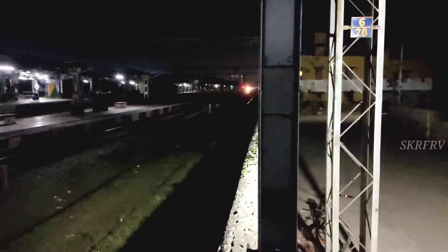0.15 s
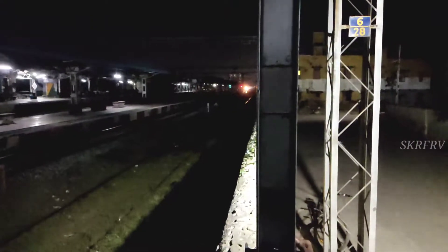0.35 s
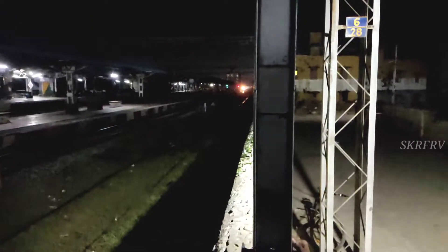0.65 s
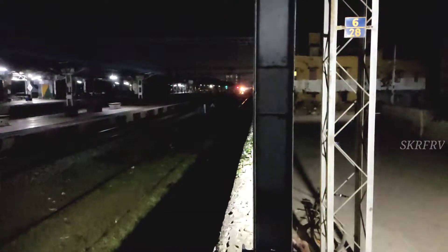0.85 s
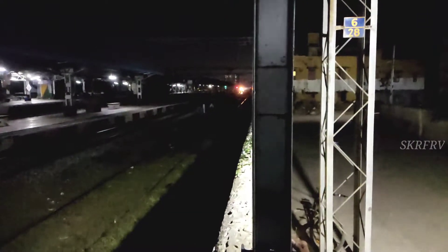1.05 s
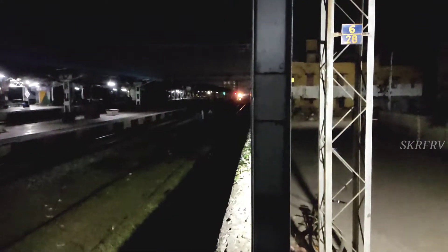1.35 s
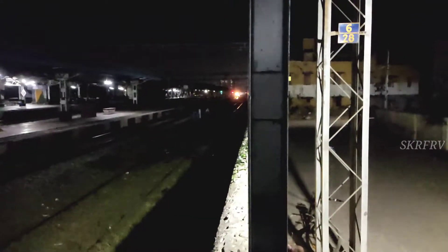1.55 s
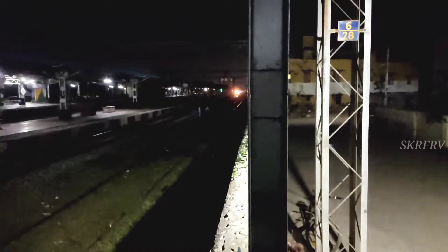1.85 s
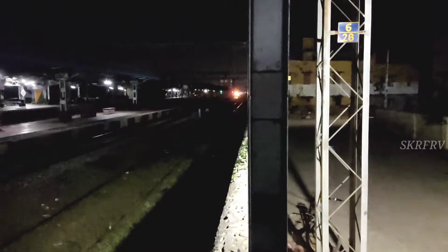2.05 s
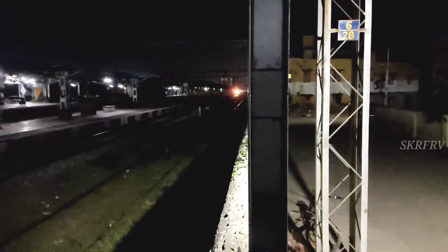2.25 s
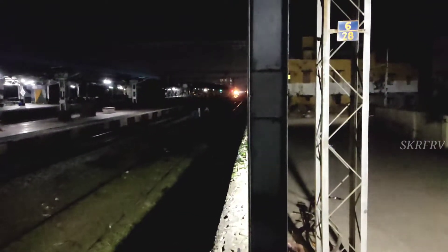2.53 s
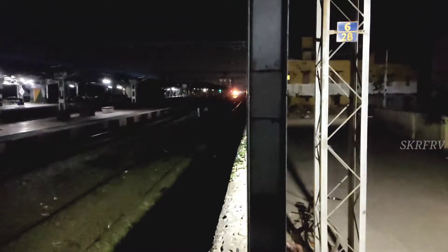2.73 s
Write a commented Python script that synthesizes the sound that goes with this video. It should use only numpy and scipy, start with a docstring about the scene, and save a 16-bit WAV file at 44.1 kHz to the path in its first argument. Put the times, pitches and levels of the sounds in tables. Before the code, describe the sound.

A train rolls away beside an open station platform, its drive motors giving a wavering, fuzzy mid-pitched whine over low hums, wheel rumble and airy hiss, all gradually fading; close handheld stereo microphone outdoors.

```python
"""A train rolls away past a station platform, in stereo, under 3 s.
From the start its traction drive whines on fuzzy overtones (wavering tones on noise skirts), over low and deep
hums and wheel noise (shaped, patchy noise). A third hum swells to a peak near 1.4 s; the roar jumps
briefly near 2.1 s. By the end the upper whine, hums, roar, sizzle and hiss have died down."""
import sys
import numpy as np
from scipy import signal
from scipy.fft import rfft, irfft, next_fast_len
from scipy.io import wavfile
from scipy.ndimage import uniform_filter1d, map_coordinates

SR = 44100
rng = np.random.default_rng(int(sys.argv[2]) if len(sys.argv) > 2 else 0)


def master(y):
    """Save y as 16-bit WAV."""
    cut = np.clip(np.atleast_2d(y).T, -1, 1)
    pcm = np.round(cut * 32767)  # scale
    wavfile.write(sys.argv[1], SR, pcm.astype(np.int16))


N = 127449


def amp(db):
    """Amplitude from dB."""
    return 10 ** (np.asarray(db) / 20)


def unit(x):
    """x scaled to rms 1 over all channels."""
    return x / np.sqrt(np.mean(abs(x) ** 2) + 1e-20)


def along(points, hz):
    """(Hz, value) points interpolated on a log frequency axis."""
    point_hz, value = np.transpose(points)
    return np.interp(np.log(hz + 1), np.log(point_hz + 1), value)


def curve(rows):
    """Each column after the time, interpolated at every sample."""
    time_s, *columns = np.transpose(rows)
    return np.array([np.interp(np.arange(N) / SR, time_s, c) for c in columns])


def wobble(knots_per_s):
    """Smooth random curve: a spline through normal draws."""
    knots = rng.standard_normal(int(N * knots_per_s / SR) + 4)
    return map_coordinates(knots, [np.arange(N) * knots_per_s / SR])


def filtered(x, response):
    """x filtered by a complex response of frequency in Hz."""
    m = next_fast_len(N + SR // 4)
    return irfft(rfft(x, m) * response(np.fft.rfftfreq(m, 1 / SR)), m)[..., :N]


def half_turn(alike):
    """Mid-side mixing angle whose left-right correlation is alike."""
    return np.arccos(np.clip(alike, 0, 1)) / 2


def spread(pair, alike):
    """Left and right of a given correlation from two unrelated signals."""
    turn = half_turn(alike)
    mid, side = np.cos(turn) * pair[0], np.sin(turn) * pair[1]
    return np.array([mid + side, mid - side])


def narrow(width_hz, alike):
    """Stereo complex noise, half amplitude at +-width_hz: random swelling and wavering for a tone."""
    f = np.fft.fftfreq(next_fast_len(N), 1 / SR)
    noise = rng.standard_normal((2, len(f))) + 1j * rng.standard_normal((2, len(f)))
    pair = spread(noise, alike)
    return unit(np.fft.ifft(pair / (1 + (f / width_hz) ** 2))[:, :N])


def tone(hz):
    """Rotating phasor whose real part has rms 1."""
    return np.sqrt(2) * np.exp(2j * np.pi * np.cumsum(hz + np.zeros(N)) / SR)


def rush(spectrum, level, patchy_db, flutter_db):
    """Stereo noise: random gain patches in time and frequency, shaped spectrum, fluttering level curve."""
    # Left-right likeness: hz, correlation
    likeness = [(60, 1), (330, 0.98), (480, .62), (1000, 0.33), (1800, 0.18), (4000, 0.36), (6000, 0.29),
                (8500, .1)]
    # Stereo balance: hz, left_over_right_db
    balance = [(60, 4.5), (350, 3.5), (520, 3), (1000, 0.5), (1700, 6), (2700, -3.5), (4000, -0.1),
               (6000, -0.1), (7300, -4), (8600, 3), (12000, -1.5)]

    z = signal.stft(rng.standard_normal((2, N)), nperseg=512)[2]
    # Patches: 5 bins by 12 frames, same on both channels
    field = uniform_filter1d(rng.standard_normal(z.shape[1:]), 5, axis=0)
    field = uniform_filter1d(field, 12, axis=1)
    pair = signal.istft(z * amp(patchy_db * unit(field)), nperseg=512)[1][:, :N]

    def mid_side_response(hz):
        turn = half_turn(along(likeness, hz))
        return amp(along(spectrum, hz)) * [np.cos(turn), np.sin(turn)]

    mid, side = filtered(pair, mid_side_response)
    stereo = unit(np.array([mid + side, mid - side]))
    balanced = filtered(stereo, lambda hz: amp([0 * hz, -along(balance, hz)]))
    return balanced * amp(curve(level) + flutter_db * wobble(7.16))


def wheels():
    """Rumble of the bogies, roar of wheel on rail; sizzle and hiss above it drift to the right."""
    # Noise spectra: hz, relative_density_db
    rumble = [(15, -7.5), (30, -14), (65, -6.5), (125, -12), (160, -5), (200, 3.5), (270, -0.5), (370, -6),
              (500, -3), (800, -56)]
    roar = [(250, -6), (430, -1.8), (540, -7), (610, 0), (680, -5), (800, -6.5), (1200, -9.5),
            (1300, -11.5), (1750, -8), (2200, -8.5), (2700, -17.5), (3700, -21.5), (4300, -41), (6000, -79)]
    sizzle = [(2600, -18), (3100, -11), (3800, -3), (4300, -1), (4800, -4.5), (5300, -7), (6200, -38)]
    hiss = [(4200, -23), (4900, -8.5), (5500, -2), (6400, -4.5), (7300, 0.5), (8200, 0), (9000, -4),
            (9600, -23), (10500, -27), (12000, -31), (14000, -60)]
    # Levels before balance and flutter, both channels: time_s, level_db
    rumble_level = [(0, -27), (.4, -27), (.8, -27), (1.3, -30), (1.5, -27.5), (1.7, -31.5), (2.2, -28),
                    (2.4, -32.5), (2.89, -30)]
    roar_level = [(0, -25), (.3, -26.5), (.95, -27), (1.05, -26), (1.2, -28), (1.8, -30), (2.03, -30),
                  (2.08, -25), (2.14, -29.5), (2.89, -32)]
    # Levels before balance and flutter: time_s, left_db, right_db
    sizzle_level = [(0, -39.5, -42), (.8, -42.5, -42.5), (1.2, -44, -43), (1.4, -40.5, -39.5),
                    (1.7, -42, -41), (1.9, -48, -41.5), (2.05, -45.5, -39), (2.3, -49.5, -43.5),
                    (2.89, -54.5, -45)]
    hiss_level = [(0, -33.5, -35.5), (.55, -32.5, -33), (1, -33, -33.5), (1.5, -36, -35), (2.07, -35, -34),
                  (2.3, -38.5, -37.5), (2.89, -40, -37.5)]

    return (rush(rumble, rumble_level, patchy_db=1.5, flutter_db=0.6)
            + rush(roar, roar_level, patchy_db=1.5, flutter_db=0.9)
            + rush(sizzle, sizzle_level, patchy_db=2.0, flutter_db=1.5)
            + rush(hiss, hiss_level, patchy_db=1.5, flutter_db=0.54))


def weak_lines():
    """Faint fuzzy partials: narrow noise on a tone, with a steady fade, one swell and a random level."""
    # Weak partials: pitch_hz, left_start_db (before swell), fade_db_per_s, swell_time_s, swell_db,
    # waver_half_width_hz, left_over_right_db, left_right_correlation
    weak = [(1178, -46, 4, 1.75, 9, 8, 2, .6), (1458, -48, .5, 1.7, 5, 12, 4, .7),
            (2030, -45, -3, 2.1, 1, 50, 5, .5), (2430, -42, 3, .8, 2, 30, 1.5, .6),
            (2915, -48, 2.5, 1.65, 7, 20, -1, .6), (3325, -51, 1, 2.15, 5, 16, 1, .6),
            (3868, -53, 2, 1.4, 2, 45, -2, .6)]
    swell_width_s, random_level_db = 0.3, 3

    out, t = 0, np.arange(N) / SR
    for hz, start_db, fade_db_per_s, swell_time_s, swell_db, width_hz, pan_db, alike in weak:
        swell = np.exp(-((t - swell_time_s) / swell_width_s) ** 2)
        level_db = start_db - fade_db_per_s * t + swell_db * swell
        level_db = level_db + random_level_db * wobble(2.99)
        line = (narrow(width_hz, alike) * tone(hz)).real
        out = out + amp(level_db - [[0], [pan_db]]) * line
    return out


def strong_lines():
    """Drive overtones and hums: tone plus narrow flutter, on a skirt following the slow level."""
    # Whine partials, then hums, before pitch drift: time_s, pitch_hz, left_db, right_db (skirt excluded)
    first = [(0.0, 484, -37, -28), (0.14, 487, -33, -28), (0.18, 489, -32, -36), (0.26, 493, -37, -37),
             (0.33, 492, -25, -25), (0.42, 492, -28, -36), (0.48, 492, -25, -29), (0.57, 491, -30, -27),
             (0.63, 490, -22, -24), (0.7, 489, -25, -21), (0.76, 489, -22, -22), (0.8, 490, -26, -26),
             (0.86, 490, -24, -22), (0.92, 490, -28, -26), (1.02, 491, -24, -22), (1.12, 491, -26, -32),
             (1.16, 492, -35, -34), (1.2, 492, -23, -26), (1.32, 488, -28, -27), (1.46, 489, -24, -36),
             (1.52, 489, -28, -26), (1.6, 489, -21, -21), (1.68, 488, -22, -24), (1.76, 488, -31, -33),
             (1.82, 489, -23, -25), (1.92, 490, -33, -37), (1.98, 489, -23, -30), (2.14, 492, -34, -38),
             (2.18, 491, -37, -30), (2.24, 490, -33, -28), (2.3, 490, -31, -39), (2.36, 490, -33, -33),
             (2.42, 490, -21, -27), (2.48, 491, -31, -32), (2.6, 493, -29, -32), (2.72, 492, -39, -41),
             (2.8, 492, -29, -32), (2.88, 493, -29, -34)]
    second = [(0.0, 983, -16, -21), (0.16, 984, -19, -28), (0.21, 985, -17, -24), (0.26, 986, -10, -16),
              (0.38, 986, -10, -13), (0.45, 984, -17, -18), (0.56, 982, -20, -25), (0.62, 983, -11, -16),
              (0.73, 982, -11, -13), (0.8, 980, -16, -15), (0.88, 979, -21, -17), (0.92, 979, -17, -18),
              (0.96, 979, -24, -24), (1.0, 982, -20, -27), (1.1, 987, -18, -21), (1.14, 985, -23, -24),
              (1.22, 979, -17, -17), (1.46, 981, -25, -27), (1.52, 981, -19, -23), (1.58, 979, -19, -26),
              (1.62, 978, -15, -19), (1.7, 977, -24, -17), (1.82, 975, -18, -24), (1.86, 976, -26, -26),
              (1.9, 978, -24, -24), (1.98, 980, -23, -30), (2.02, 979, -18, -25), (2.06, 978, -27, -30),
              (2.14, 978, -21, -24), (2.26, 978, -22, -30), (2.38, 978, -19, -23), (2.46, 980, -21, -30),
              (2.5, 983, -25, -33), (2.56, 982, -28, -26), (2.66, 983, -30, -25), (2.7, 984, -27, -33),
              (2.88, 982, -28, -32)]
    fourth = [(0, 1962, -35, -39), (.26, 1952, -32, -35), (.4, 1955, -34, -37), (.8, 1950, -33, -39),
              (1.3, 1938, -31, -39), (1.9, 1938, -32, -40), (2.4, 1955, -34, -42), (2.52, 1955, -32, -37),
              (2.88, 1955, -33, -40)]
    seventh = [(0, 3405, -33.5, -42), (.32, 3420, -41, -39), (0.451, 3417, -32.5, -35),
               (.55, 3405, -36, -44), (.65, 3420, -38, -35.5), (.75, 3445, -37.5, -39),
               (.87, 3407, -32, -27.5), (1.05, 3402, -37, -37.5), (1.2, 3395, -44, -38),
               (1.38, 3396, -43, -40.5), (1.84, 3390, -50, -45), (2.1, 3403, -56, -55.5)]
    low_hum = [(0, 226, -33.5, -42), (.25, 228, -27.5, -39), (.33, 226, -34, -35), (.42, 226, -30, -33),
               (.68, 225, -27, -31), (.82, 224, -38, -49), (.9, 226, -27, -31), (1.02, 224, -41.5, -41),
               (1.12, 222, -31.5, -38.5), (1.5, 220, -49, -55), (1.9, 222, -27, -33), (2.2, 220, -35, -40),
               (2.88, 219, -44, -47)]
    swelling_hum = [(0, 328, -53.5, -59), (0.599, 330, -38, -54), (1.141, 314, -33, -42),
                    (1.25, 320, -36, -42), (1.4, 322, -27, -33), (1.6, 322, -34, -44),
                    (1.899, 315, -35, -47), (2.1, 320, -35, -45), (2.881, 321, -43.5, -57)]
    deep_hum = [(0, 66, -34.5, -46), (.3, 68, -48.5, -50), (.75, 68.3, -50, -53), (.92, 69, -31.5, -37),
                (1.25, 67.8, -38.5, -44), (1.35, 65.8, -49, -52), (1.5, 61.7, -35, -40),
                (1.74, 65.3, -51, -52), (1.84, 65.8, -31, -35), (1.92, 68, -44, -48), (2, 69.7, -33, -37),
                (2.2, 67.8, -54, -54), (2.88, 68, -54, -55)]
    # Slow phase turn between the ports, before random drift: time_s, left_lead_rad
    first_turn = [(0, -.6), (.36, .3), (.44, -1), (.68, -.3), (.92, -1.3), (1, .1), (1.38, -.7), (1.84, .4),
                  (2.2, -.2), (2.4, 1.9), (2.8, -.8)]
    second_turn = [(0.2, -.6), (.68, 0), (.76, -.7), (1.4, .1), (1.65, -.3), (1.71, 2.7), (1.79, -.1),
                   (2.44, -.9), (2.55, .8)]
    seventh_turn = [(0, -.6), (1.5, .3), (2.2, 2.2)]
    still = [(0, 0)]
    # Line texture, one row per line above: steady_power_share, waver_half_width_hz, skirt_half_width_hz,
    # skirt_db (re slow level), skirt_growth_db_per_s, left_right_correlation, port_phase_drift_rad
    texture = [(.95, 15, 49, -9, 2, 0.47, 0.31), (0.93, 16, 39.6, -9, 3.5, 0.52, 0.13),
               (0.1, 22.6, 78, -1, 0.68, 0.48, 0.44), (0.25, 50, 98, -3, 1, 0.87, 0.4),
               (0.72, 3.2, 40, -15, 0.5, 0.86, .1), (0.9, 3.7, 17, -20, 6.5, 0.84, .15),
               (0.48, 9, 22, -10.5, 0, .98, .05)]
    pitch_drift_share = 0.004

    lines = [first, second, fourth, seventh, low_hum, swelling_hum, deep_hum]
    turns = [first_turn, second_turn, still, seventh_turn, still, still, still]
    out, t = 0, np.arange(N) / SR
    for rows, turn, settings in zip(lines, turns, texture):
        steady, waver_hz, skirt_hz, skirt_db, growth_db_per_s, alike, drift_rad = settings
        hz, *level_db = curve(rows)
        hz = hz * (1 + pitch_drift_share * wobble(14))

        left_lead_rad = curve(turn)[0] + drift_rad * wobble(7.14)
        ports = np.exp(np.outer([.5j, -.5j], left_lead_rad))
        core = np.sqrt(steady) * ports + np.sqrt(1 - steady) * narrow(waver_hz, alike)

        # 0.5 s mean level
        slow_db = uniform_filter1d(level_db, SR // 2, axis=1) + skirt_db + growth_db_per_s * t
        skirt = amp(slow_db) * narrow(skirt_hz, alike)
        out = out + ((amp(level_db) * core + skirt) * tone(hz)).real
    return out


def scene():
    """Sum of wheel noise, weak lines and strong lines."""
    return wheels() + weak_lines() + strong_lines()


def record(dry):
    """Two ports: the train lies off to the right, so the left port lags; band-limited."""
    # Port phase colour, besides the lag: hz, left_lead_rad
    left_lead = [(60, -0.18), (250, 0.25), (500, -0.0074), (700, 0.62), (1000, 0.8), (1600, 0.57),
                 (2000, 1), (2700, -0.35), (3300, 0.26), (4500, -0.099), (5500, -0.074), (7000, -1.24),
                 (8000, 0.12)]
    left_lag_s, top_hz = 23 / SR, 14150

    def response(hz):
        # Half the phase difference on each port
        half_lead_rad = along(left_lead, hz) / 2 - np.pi * hz * left_lag_s
        return (hz < top_hz) * np.exp(np.outer([1j, -1j], half_lead_rad))

    return filtered(dry, response)


dry = scene()
out = record(dry)
master(out)
```